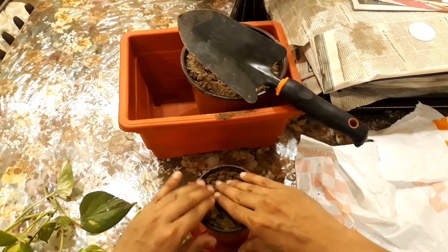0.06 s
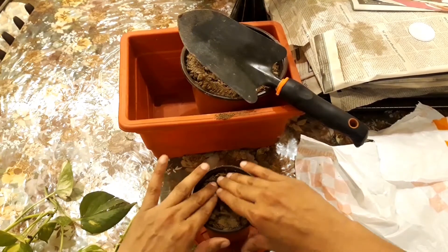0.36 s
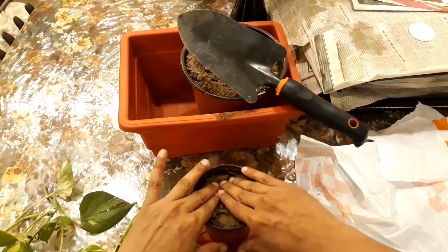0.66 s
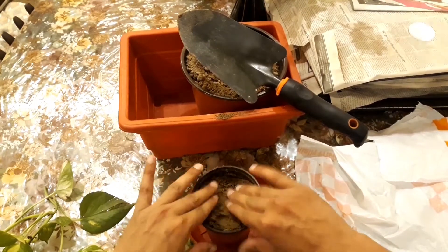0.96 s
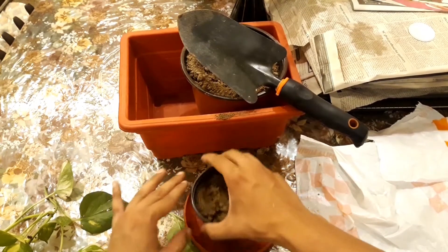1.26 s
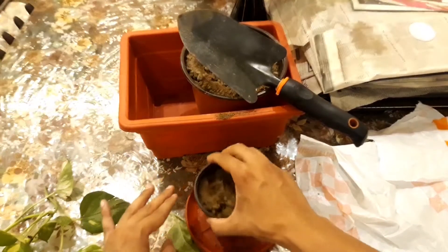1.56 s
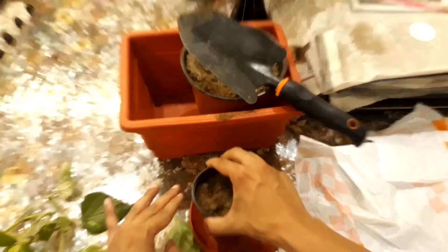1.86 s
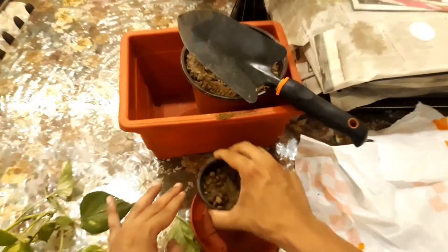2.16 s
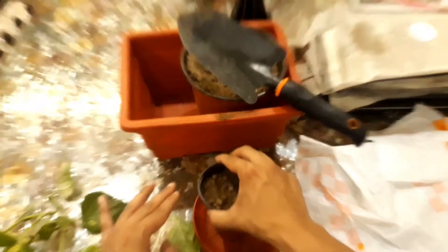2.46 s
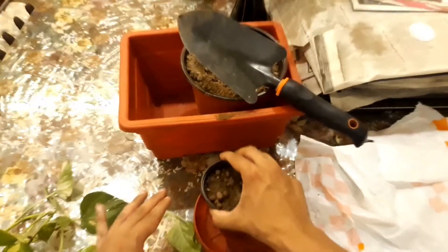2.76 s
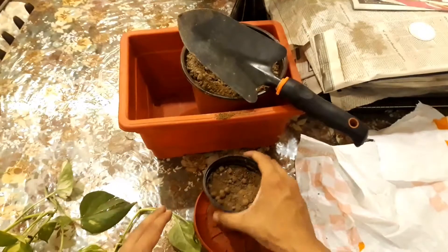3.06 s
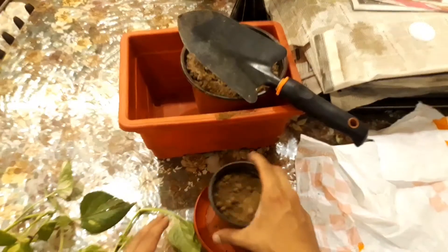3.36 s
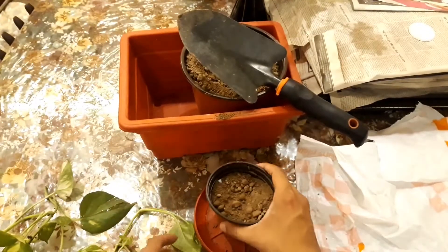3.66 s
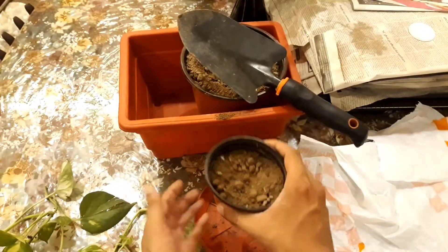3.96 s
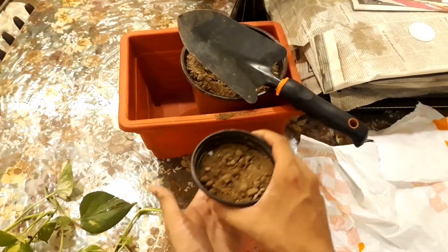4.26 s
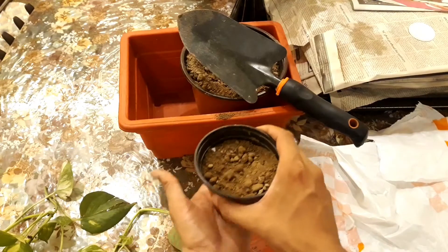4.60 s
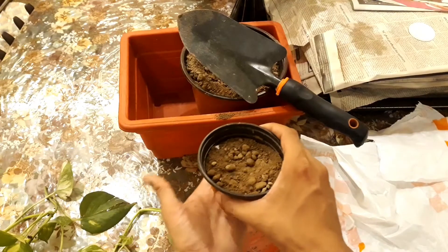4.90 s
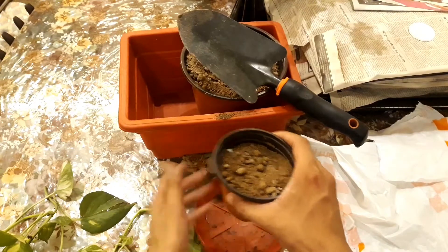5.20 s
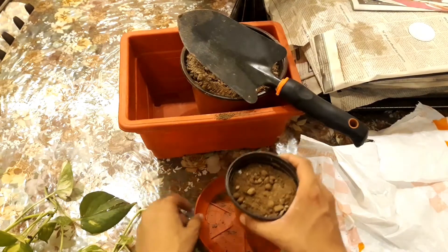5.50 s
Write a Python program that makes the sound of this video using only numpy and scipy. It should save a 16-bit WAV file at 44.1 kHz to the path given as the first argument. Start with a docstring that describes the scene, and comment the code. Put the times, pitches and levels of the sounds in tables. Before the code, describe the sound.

In an echoing, hard-walled room, faint rustles of pressed soil give way to a quick run of hollow plastic clacks as a small pot is knocked on its saucer. Sand jumps and the floor booms softly under each. After a last single knock and some crumbling, the pot is patted lightly on a palm and the saucer scrapes briefly over grit. The sound is dead centre at the microphone, over quiet air noise.

```python
"""On the floor of a hard-walled room, a small plastic pot of sandy soil is knocked on its saucer to settle it.
Each knock is a clack of the base, a jump of sand and a low boom of floor and room. First, fingers press
the soil; afterwards the pot is patted lightly on a palm and the saucer is shifted over grit.
Everything sits dead centre before the microphone, with the room's echo around it and a soft hush below."""
import sys
import numpy as np
from scipy import signal
from scipy.fft import rfft, irfft, next_fast_len
from scipy.io import wavfile

SR = 44100
rng = np.random.default_rng(int(sys.argv[2]) if len(sys.argv) > 2 else 0)


def to_wav(s):
    """Save 16-bit WAV."""
    ch = np.atleast_2d(s).T  # columns
    pcm = np.round(np.clip(ch, -1, 1) * 32767)  # PCM
    wavfile.write(sys.argv[1], SR, pcm.astype(np.int16))


N = 253134

# The base lands edge first, then flat, and the pot's weight follows; where it lands sets the hollow pitch.
# Each row: start in seconds, edge strength in dB, seconds to fall flat, flat strength in dB,
# brightness in dB per octave, hollow boost in dB, hollow pitch in Hz, weight in dB.
KNOCKS = [(1.4485, -31.5, 0.0042, -26, 2.5, 4.5, 750, -39), (1.6277, -29, .0075, -31, 2, 6, 704, -43.5),
          (1.8152, -31.5, 0.0034, -27, 4, 9.5, 830, -35), (2.0108, -20.5, .0052, -22.5, 2.5, 6, 790, -29.5),
          (2.2001, -24.5, 0.0044, -24.5, .5, 3, 760, -29.5),
          (2.3897, -23, .0027, -22, -1.5, 1.5, 1150, -27.5),
          (2.5883, -30, .0023, -21, -1.5, 5.5, 1070, -26), (2.759, -30.5, 0.0058, -30.5, .5, 2, 1050, -30),
          (3.3373, -31.5, 0.0036, -28, 0, 5, 740, -39)]


def from_db(db):
    return 10 ** (np.asarray(db) / 20)


def rms_one(x):
    return x / np.sqrt(np.mean(x ** 2) + 1e-20)


def at_hz(points, hz):
    """Read a table on a log-frequency axis."""
    known_hz, values = np.transpose(points)
    return np.interp(np.log(np.maximum(hz, 1)), np.log(known_hz), values)


def colour(x, spectrum):
    """Causal (minimum-phase) filter with the given spectrum."""
    size = 2 * next_fast_len(len(x))
    gain = from_db(at_hz(spectrum, np.arange(size // 2 + 1) * SR / size))
    cepstrum = irfft(np.log(gain))
    cepstrum[1:size // 2] *= 2
    cepstrum[size // 2 + 1:] = 0
    return irfft(rfft(x, size) * np.exp(rfft(cepstrum)))[:len(x)]


def ring(clicks, hz, t60):
    """A unit click sets a sine of height 1 ringing."""
    r, w = from_db(-60 / (t60 * SR)), 2 * np.pi * hz / SR
    return signal.lfilter([0, np.sin(w)], [1, -2 * r * np.cos(w), r * r], clicks + 1e-18)


def resonate(x, hz, width_hz):
    """Band resonance with gain 1 at its peak."""
    r, w = np.exp(-np.pi * width_hz / SR), 2 * np.pi * hz / SR
    return signal.lfilter(np.array([1, 0, -1]) * (1 - r * r) / 2, [1, -2 * r * np.cos(w), r * r], x + 1e-18)


def clicks_at(times, levels_db):
    """One click for each time in seconds."""
    clicks = np.zeros(N)
    clicks[np.round(times * SR).astype(int)] = from_db(levels_db)
    return clicks


def dying(jolts, t60):
    """Amplitude envelope: each jolt adds energy, which dies away."""
    fall = from_db(-120 / (t60 * SR))
    return np.sqrt(signal.lfilter([1], [1, -fall], jolts ** 2 + 1e-24))


def hush(broad_db=-56):
    """The empty room: steady air noise with a few resonances."""
    # The air noise. Each row: frequency in Hz, relative level in dB.
    spectrum = [(15, -100), (25, -15), (58, -20.5), (76, -7.5), (127, -4), (229, -3.5), (301, -6.5),
                (373, -8), (427, -4), (560, -2.5), (1230, -8.5), (1700, -10.5), (2840, -21.5),
                (3340, -23.5), (16000, -27.5)]
    # Resonances standing out of it. Each row: centre in Hz, width in Hz, rms level in dB.
    peaks = [(83.8, 2.4, -68.5), (217, 87, -74.5), (561, 34, -65), (3480, 230, -74), (4430, 460, -75.5)]
    air = from_db(broad_db) * rms_one(colour(rng.standard_normal(N), spectrum))
    hum = sum(from_db(db) * rms_one(resonate(rng.standard_normal(N), hz, width)) for hz, width, db in peaks)
    return air + hum


def hiss(level_db=-72.5):
    """A thin, steady noise floor."""
    # The hiss. Each row: frequency in Hz, relative level in dB.
    spectrum = [(15, -36), (25, -13), (277, -5.5), (1610, -17), (1740, -12), (4490, -2.5), (5880, -3.5),
                (14800, -5.5), (16000, -16)]
    return from_db(level_db) * rms_one(colour(rng.standard_normal(N), spectrum))


def room_echo(x, wet_db=-3.5, build_s=0.0018, bands=16):
    """Echoes from all sides merge into a smooth wash: each band stores energy and lets it die."""
    # The room's decay. Each row: frequency in Hz, t60 in seconds.
    decay = [(100, 1), (550, 0.65), (1500, 0.56), (3500, 0.59), (7000, 0.1), (16000, 0.09)]
    # The echo's colour. Each row: frequency in Hz, gain in dB.
    spectrum = [(60, -11), (130, 10.5), (300, -2), (560, -0.5), (900, -3.5), (1500, -2), (3000, 1),
                (4500, -10.5), (7000, -12.5), (16000, 3)]
    edges = np.geomspace(70, 16000, bands + 1)
    white, wash = rng.standard_normal((2, N)), np.zeros(N)
    rise = np.exp(-1 / (build_s * SR))
    for k, (low, high) in enumerate(zip(edges, edges[1:])):
        band = signal.butter(2, [low, high], "band", fs=SR, output="sos")
        hz = np.sqrt(low * high)
        fall = from_db(-120 / (at_hz(decay, hz) * SR))
        power = signal.sosfilt(band, x) ** 2
        energy = signal.lfilter([(1 - rise) * (1 - fall)], [1, -rise - fall, rise * fall], power)
        noise = rms_one(signal.sosfilt(band, white[k % 2]))
        wash += from_db(at_hz(spectrum, hz)) * np.sqrt(np.abs(energy)) * noise
    return from_db(wet_db) * wash


def standing_waves(x):
    """A few tones hum on between the hard walls after each sound."""
    # Room modes. Each row: pitch in Hz, gain in dB, t60 in seconds.
    modes = [(524, -8, 0.42), (569, 5.5, 0.41), (720, -23, 0.19), (1880, -0.5, 0.44), (1990, -1, 0.17),
             (3040, -7, 0.31), (3294, 7.5, 0.28)]
    return sum(from_db(db) * resonate(x, hz, np.log(1000) / (np.pi * t60)) for hz, db, t60 in modes)


def grains(per_s, spread_db):
    """Sand grains slip at random, most small and a few large; rms 1."""
    sizes = from_db(spread_db * np.minimum(rng.exponential(1, N), 4))
    slips = rng.random(N) < per_s / SR
    return rms_one(slips * sizes * rng.choice([-1, 1], N))


def stick_slip(rate_hz, depth_db):
    """Uneven gain of a surface that catches and slips."""
    slow = signal.sosfilt(signal.butter(2, rate_hz, fs=SR, output="sos"), rng.standard_normal(N))
    return from_db(depth_db * rms_one(slow))


def rubbing(grip_db=-73):
    """Fingers and saucer drag over sand, a rustle above a dull scuff; the grip always rustles faintly."""
    # Fingers press the soil. Each row: middle and length in seconds, rustle in dB, scuff in dB.
    presses = [(0.01, .07, -62.5, -77), (0.352, 0.068, -67.5, -85), (0.5, 0.076, -60.5, -71),
               (0.58, .05, -66.5, -60.5), (0.915, 0.08, -64, -67), (1.265, 0.085, -63.5, -77)]
    # The saucer shifts on the gritty floor. Each row: time in seconds, rustle in dB, scuff in dB.
    slide = [(5.33, -78, -85), (5.39, -58.5, -72), (5.43, -65.5, -70), (5.52, -57, -62), (5.59, -55, -57.5),
             (5.66, -62, -55), (5.73, -54, -64)]
    # Colours of the rustle and the scuff. Each row: frequency in Hz, relative level in dB.
    rustle_spectrum = [(1200, -27), (2000, -10), (2400, 1), (2800, -8.5), (3080, 3.5), (3500, -1.5),
                       (4200, 3), (5300, -4), (6500, -15), (15000, -43)]
    scuff_spectrum = [(50, -3), (100, -1.5), (320, 6.5), (600, 2.5), (1200, -2), (2200, -27), (5000, -38)]
    t = np.arange(N) / SR
    slide_s, *slide_db = np.transpose(slide)
    gains = from_db([np.interp(t, slide_s, db) for db in slide_db])
    for middle_s, length_s, *press_db in presses:
        swell = np.exp(-2 * ((t - middle_s) / length_s) ** 2)
        gains += np.outer(from_db(press_db), swell)
    rustle_gain, scuff_gain = gains
    fine_sand = grains(per_s=2400, spread_db=0.5) * stick_slip(rate_hz=29, depth_db=1.26)
    rustle = rms_one(colour(fine_sand, rustle_spectrum))
    scuff = rms_one(colour(grains(per_s=970, spread_db=3.5), scuff_spectrum))
    return np.hypot(from_db(grip_db), rustle_gain) * rustle + scuff_gain * scuff


def shifting_grit(touches, grit_hz, width_hz, top_hz):
    """Each light touch shifts a pinch of grit and ticks on the pot's thin wall."""
    grit = rms_one(resonate(grains(per_s=8200, spread_db=1.5), grit_hz, width_hz))
    wall = rms_one(resonate(grains(per_s=3800, spread_db=3), hz=2080, width_hz=450))
    crunch = np.zeros(N)
    for start_s, grit_db, wall_db, t60 in touches:
        crunch += dying(clicks_at(start_s, 0), t60) * (from_db(grit_db) * grit + from_db(wall_db) * wall)
    return signal.sosfilt(signal.butter(4, top_hz, fs=SR, output="sos"), crunch)


def crumbs():
    """Loose crumbs of soil give way or drop with a small, high crunch."""
    # Falling crumbs. Each row: start in seconds, grit in dB, wall tick in dB, t60 in seconds.
    falls = [(0.183, -51.5, -75, 0.15), (0.5013, -49, -52, .016), (0.7374, -50.5, -59, .043),
             (2.0835, -35.5, -56, 0.02), (2.9852, -55.5, -53, 0.3), (3.388, -55.5, -53, 0.23),
             (5.543, -49, -77, 0.05), (5.583, -54, -56, 0.027)]
    return shifting_grit(falls, grit_hz=4570, width_hz=670, top_hz=6200)


def pot(times, levels_db, brightness, hollow_db, hollow_hz, vary_db=2.5, pivot_hz=1500, hollow_octaves=0.34):
    """Struck plastic rings: brightness tilts the modes in dB per octave, the hollow shapes the middle."""
    # Pot and saucer, damped by the soil. Each row: pitch in Hz, level in dB, t60 in seconds.
    modes = [(192, -26, 0.03), (240, -14, 0.05), (354, -18.5, 0.074), (400, -24, 0.18), (515.5, -18, 0.18),
             (567.7, -18.5, 0.16), (649, -8, 0.062), (741.5, -14, 0.085), (828, -16.5, 0.075),
             (945, -17.5, 0.11), (1104, -14, 0.038), (1400, -24, 0.015), (1418, -24.5, 0.22),
             (1660, -14, 0.021), (1803, -19.5, 0.11), (1870, -16, 0.05), (2157, -16.5, 0.046),
             (2500, -32, 0.016), (3110, -13, 0.014), (3340, -25, 0.031), (3730, -14.5, 0.048),
             (3870, -10, 0.012), (4450, -17, 0.029), (4870, -13, 0.0084)]
    scatter_db = vary_db * rng.standard_normal((len(times), len(modes)))
    ringing = np.zeros(N)
    for k, (hz, mode_db, t60) in enumerate(modes):
        tilt_db = brightness * np.log2(hz / pivot_hz)
        middle_db = hollow_db * np.exp(-(np.log2(hz / hollow_hz) / hollow_octaves) ** 2)
        strikes = clicks_at(times, levels_db + mode_db + tilt_db + middle_db + scatter_db[:, k])
        ringing += (-1) ** k * ring(strikes, hz, t60)
    return ringing


def pats(click_db=1, wall_db=-2.5, thump_db=-1):
    """Each pat clicks the plastic, jolts the grit and thumps on the palm, at levels relative to its strength."""
    # Pats, a little harder each time. Each row: start in seconds, strength in dB.
    strokes = [(4.1643, -59.5), (4.3771, -50.5), (4.5856, -49.5), (4.7991, -46.5), (5.0055, -45.5)]
    times, strength_db = np.transpose(strokes)
    click = pot(times, strength_db + click_db, brightness=3.1, hollow_db=-8, hollow_hz=700)
    touches = [(start_s, db, db + wall_db, 0.057) for start_s, db in strokes]  # 57 ms t60
    grit = shifting_grit(touches, grit_hz=4030, width_hz=1100, top_hz=5900)
    thump = ring(clicks_at(times, strength_db + thump_db), hz=170, t60=0.044)
    return click + grit + thump


def boom(weight_lag_s=0.002, low_cut_hz=42):
    """Just after the base falls flat, its weight loads the floor and drives only the lowest modes."""
    # Floor and room; neighbouring modes swing against each other, so the boom swells and beats.
    # Each row: pitch in Hz, gain in dB, t60 in seconds.
    modes = [(84.5, 2, 0.49), (105.2, 7.5, 0.16), (111.8, -2, 0.29), (134.8, -18, 0.79),
             (198.8, -16.5, 0.44)]
    edge_s, _, fall_s, *_, weight_db = np.transpose(KNOCKS)
    push = clicks_at(edge_s + fall_s + weight_lag_s, weight_db)
    swing = sum((-1) ** k * from_db(db) * ring(push, hz, t60) for k, (hz, db, t60) in enumerate(modes))
    return signal.sosfilt(signal.butter(2, low_cut_hz, "high", fs=SR, output="sos"), swing)


def contacts(rebound_s=0.0032, rebound_db=-12.5):
    """The base meets the saucer three times a knock: on its edge, flat, and after a small hop."""
    edge_s, edge_db, fall_s, flat_db, *tone, _ = np.transpose(KNOCKS)
    flat_s = edge_s + fall_s
    hop_s = flat_s + rebound_s * rng.uniform(0.71, 1.372, len(KNOCKS))
    hop_db = flat_db + rebound_db
    return np.hstack([(edge_s, edge_db, *tone), (flat_s, flat_db, *tone), (hop_s, hop_db, *tone)])


def knocks(crack_db=8, jump_db=-5, settle_db=-19):
    """The base clacks on the saucer: ringing plastic, a short crack, and sand that jumps and settles."""
    # Colour of the crack and the sand. Each row: frequency in Hz, gain in dB.
    spectrum = [(100, -12), (260, 3), (700, 8), (1500, -2.5), (2500, -3.5), (3200, -2.5), (4200, -5),
                (5200, -8), (6700, -17), (7600, -29), (11000, -27), (16000, -34)]
    times, levels_db, brightness, hollow_db, hollow_hz = contacts()
    jolts = clicks_at(times, levels_db + brightness)  # brighter knocks crack louder
    crack = from_db(crack_db) * dying(jolts, t60=0.009) * rng.standard_normal(N)
    jump = from_db(jump_db) * dying(jolts, t60=0.095) * grains(per_s=8400, spread_db=5)
    settle = from_db(settle_db) * dying(jolts, t60=0.29) * grains(per_s=3400, spread_db=0.5)
    plastic = pot(times, levels_db, brightness, hollow_db, hollow_hz)
    return plastic + colour(crack + jump + settle, spectrum)


def scene():
    """Pot and room sit in the centre; only the hiss is in opposite phase left and right."""
    handling = knocks() + pats() + crumbs() + rubbing()
    centre = handling + room_echo(handling) + standing_waves(handling) + boom() + hush()
    return centre + hiss() * np.array([[1], [-1]])


def record(dry):
    """The microphone's signal is cut steeply above 15.8 kHz."""
    return signal.sosfilt(signal.ellip(12, .1, 80, 15800, fs=SR, output="sos"), dry)


dry = scene()
out = record(dry)
to_wav(out)
```